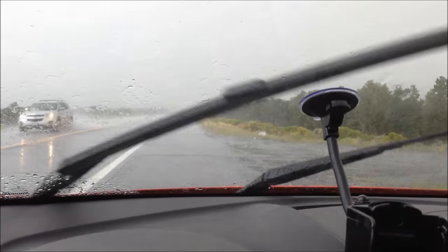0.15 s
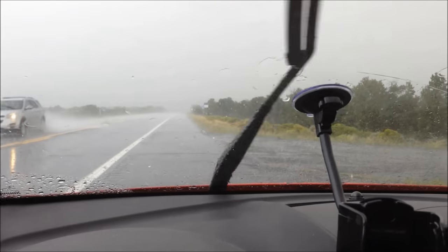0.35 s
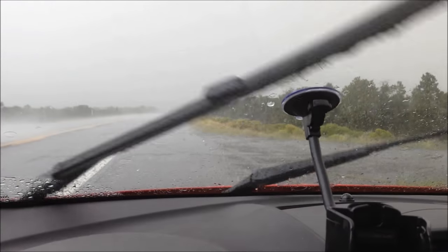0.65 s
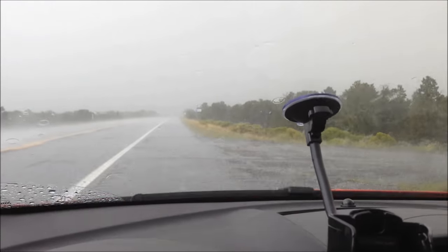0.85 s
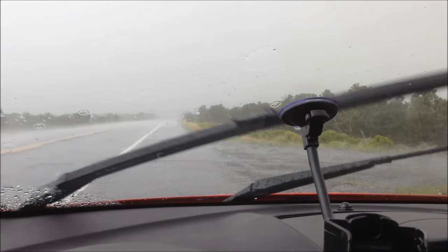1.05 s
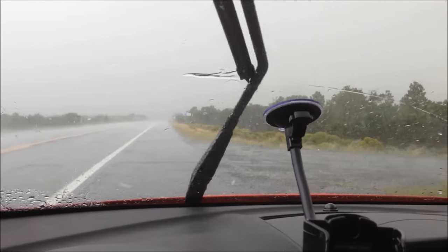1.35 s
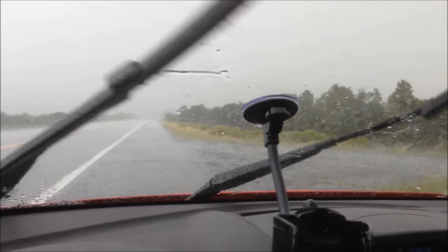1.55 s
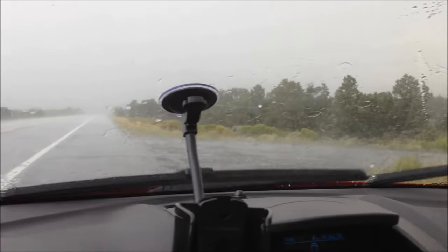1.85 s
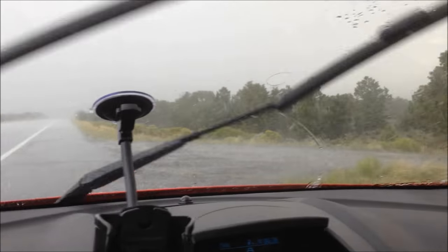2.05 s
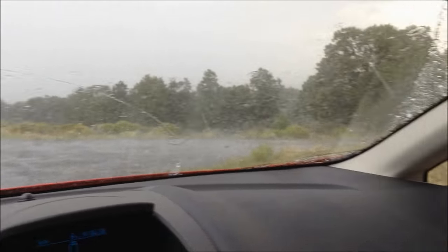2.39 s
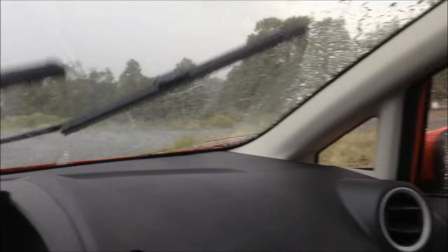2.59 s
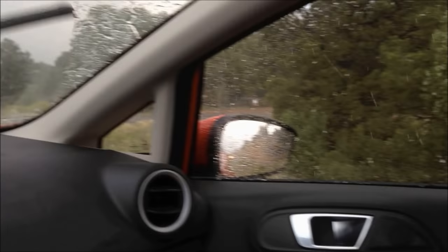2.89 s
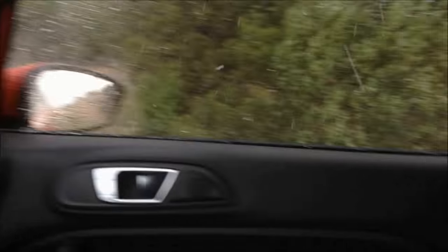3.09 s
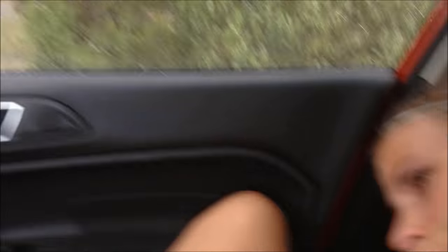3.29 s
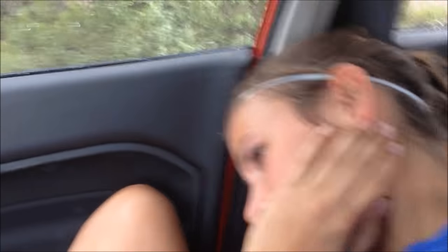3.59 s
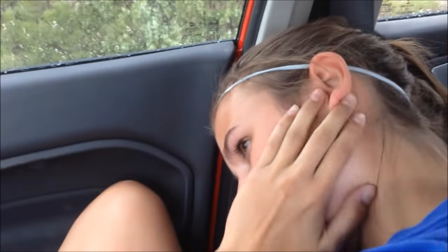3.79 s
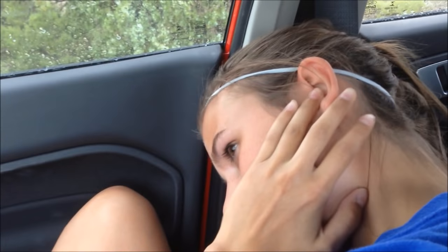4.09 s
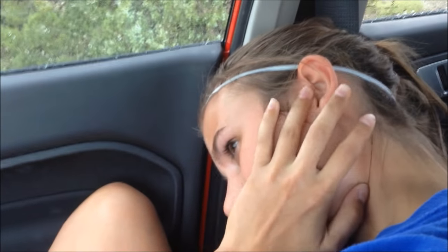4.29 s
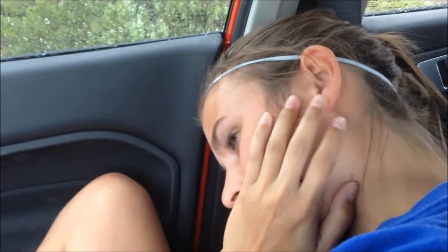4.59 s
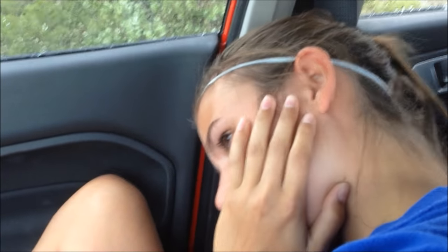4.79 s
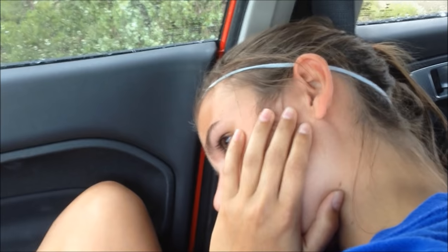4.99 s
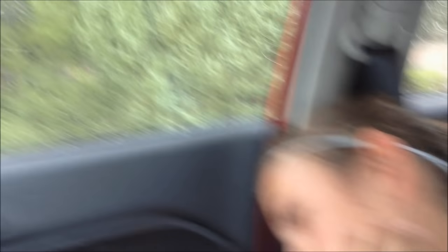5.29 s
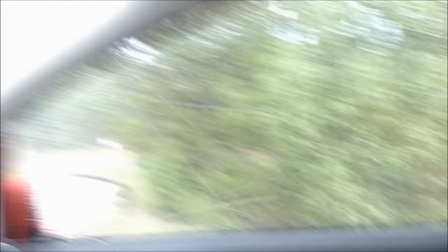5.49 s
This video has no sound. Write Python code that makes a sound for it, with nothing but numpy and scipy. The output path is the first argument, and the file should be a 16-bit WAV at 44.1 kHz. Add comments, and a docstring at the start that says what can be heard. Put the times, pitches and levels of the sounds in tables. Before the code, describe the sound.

Hailstones crack sharply on a car's windshield and thud on its roof over heavy rain, heard close from inside the cabin.

```python
"""Hail hammers a parked car in heavy rain, heard from a seat inside.
On the glass each stone is a short click plus a grainy noise tail of several decays, in third-octave bands.
Rain patter shares those bands as random drops, over a lumpy low-noise rumble of the body.
Thuds on the roof sheet are a compact knock plus a bank of decaying low modes.
A small microphone thins the bass, rounds off the loudest blows and cuts the top."""
import sys
import numpy as np
from scipy import signal
from scipy.io import wavfile
from scipy.ndimage import uniform_filter1d

SR = 44100
rng = np.random.default_rng(int(sys.argv[2]) if len(sys.argv) > 2 else 0)


def output_pcm(signal):
    """Save a mono or channel-first signal as 16-bit PCM at the path in sys.argv[1].

    Samples are clipped to [-1, 1] before scaling.
    """
    pcm = np.clip(np.atleast_2d(signal).T, -1, 1) * 32767
    wavfile.write(sys.argv[1], SR, np.round(pcm).astype(np.int16))


N = 249165

# Stones on the glass, strong and faint, each at its listed time;
# body is the low part of a crack, click its first tick, both relative to the crack:
# start_s, crack_db, body_db, spot_ring_hz, click_db
GLASS_STONES = [(0.053, -39.5, 15.5, 1740, 1), (0.074, -40.5, 9, 2240, 1), (0.1048, -32, -21, 4200, 20.5),
                (0.145, -43, -35, 4530, 16), (0.022, -50, 5, 2900, 15), (0.244, -47, -2, 4000, 15),
                (0.181, -36.5, 7, 2200, -7), (0.2589, -42, -9, 2700, 14), (0.2696, -22, 7.5, 3600, 22),
                (0.379, -29.5, -22, 4300, 22), (0.463, -50, -15, 3000, 4), (.502, -45.5, 9, 3020, 11),
                (0.522, -34.5, -11, 3620, 4), (0.5448, -30, 3, 3020, 10), (0.5507, -23.5, -5, 3400, 4),
                (0.5865, -24.5, -15, 3950, 12.5), (0.7, -39, 0, 3800, -3), (0.7063, -24, -6, 3000, 15.5),
                (0.7994, -25.5, -11, 3420, 13.5), (0.8177, -34.5, 8, 3260, -3), (0.8378, -29, -12, 3100, 3),
                (0.8538, -47, -13, 4140, 30), (0.8779, -27, -9, 3520, 13), (0.9142, -36, 1, 2110, 5),
                (0.9565, -17.5, -4, 3200, 15), (0.9668, -25, -2, 3450, 18.5),
                (1.0536, -24, 0.5, 2200, 15.5), (1.093, -38, 6, 3700, 20.5), (1.153, -34.5, 4.5, 5270, -1),
                (1.207, -25.5, 2, 2670, 16), (1.226, -33, 4, 2800, 18), (1.29, -51, -2, 3000, -3),
                (1.313, -38, -2, 4670, 4), (1.347, -30, -8, 2200, 3.5), (1.3865, -31.5, -10, 3580, 9),
                (1.422, -36.5, 5, 4200, 12), (1.433, -32.5, 1, 3160, 2), (1.541, -41, 11, 2340, 0),
                (1.638, -21.5, -11, 4180, 11), (1.688, -25, -4, 3300, 19.5), (1.7443, -24.5, -8, 3900, 16),
                (1.805, -45.5, 11, 2960, -5), (1.824, -28.5, -28, 3120, 20), (1.8603, -21.5, -12, 3940, 4),
                (1.874, -28, 0, 3460, 18), (1.929, -50.5, 17, 1980, 10), (1.9577, -45.5, -2, 3000, -6),
                (1.985, -25, -2, 4850, 18.5), (2.016, -26.5, 5, 2920, 3.5),
                (2.0775, -24.5, 3.5, 2920, 12.5), (2.1448, -29, -34, 3200, 23.5),
                (2.1843, -55, -20, 4000, 12), (2.215, -49.5, -36, 3000, 6), (2.2537, -30, -16, 3050, 2),
                (2.269, -26, -7, 2620, 6), (2.354, -38.5, 14.5, 2610, 0.5), (2.413, -27.5, -14, 3000, 13),
                (2.4428, -39.5, -10, 2910, 18), (2.497, -39, -18, 5120, 6), (2.542, -20, 1, 3260, 10.5),
                (2.5966, -21.5, -5, 4440, 8), (2.6124, -20.5, -12, 2520, 8), (2.6284, -29.5, -7, 4220, -9),
                (2.682, -56, -30, 6000, 18), (2.6953, -52, 13, 2500, -5), (2.748, -47, -10, 4800, 14),
                (2.759, -45, -23, 4480, 11), (2.767, -41, 1, 3600, -6), (2.811, -41, 12.5, 3000, -9),
                (2.853, -41.5, 11, 2010, -5), (2.8803, -48, -5, 3480, 15), (2.9142, -21, -11, 3130, 7),
                (2.963, -35, -1, 2380, 9), (3.0106, -51, -8, 2800, -1), (3.031, -26.5, 6, 2520, -0.5),
                (3.046, -25.5, -2.5, 2010, 12.5), (3.125, -32, 12.5, 1730, -9), (3.223, -33, 4.5, 4000, -1),
                (3.2445, -30.5, 14, 3040, 3), (3.29, -19, -9, 2110, 4.5), (3.365, -24, -1, 3680, 11),
                (3.422, -38.5, 13, 3150, -7), (3.334, -42, 10, 2930, 4), (3.436, -30, -24, 1780, 3),
                (3.4709, -24, -20, 4200, 13), (3.5471, -34, 10.5, 2020, 10.5), (3.5782, -35, 9.5, 1700, -8),
                (3.666, -24.5, 7.5, 2140, 3), (3.74, -38.5, -31, 5300, 4), (3.762, -30.5, 9, 4000, -3),
                (3.774, -22, 5.5, 3000, 3), (3.7864, -25.5, -25, 3170, 16), (3.8253, -27, -3, 3800, 7),
                (3.8635, -31, 7, 1940, 3), (3.9405, -26, -2, 2770, -10), (3.9775, -41, 11, 3000, -4),
                (3.996, -23.5, 1, 2900, 12), (4.0391, -22.5, 0, 3600, 11), (4.0948, -27, 7.5, 2500, 2),
                (4.1036, -22.5, 2, 2560, 14), (4.111, -25.5, -11, 4500, 4), (4.195, -26, -2, 4470, 6),
                (4.2418, -41.5, 3, 5000, -6), (4.2703, -38, 11, 1300, 20.5), (4.283, -32, 11.5, 2650, -8),
                (4.298, -30, 21, 1800, 3), (4.376, -30.5, -2, 2650, 2), (4.4063, -18, -3, 3260, 8),
                (4.432, -27.5, -2, 3300, 1.5), (4.4522, -30, -1.5, 4900, 19), (4.5505, -48, 22, 2030, 14),
                (4.5813, -41.5, 17, 2120, 5), (4.612, -29, -10, 3000, 3), (4.6169, -23.5, -8, 3460, 10),
                (4.6565, -24.5, -2, 4100, 10), (4.669, -31.5, 11.5, 1700, -5), (4.702, -41.5, 8, 1700, -5),
                (4.7504, -35.5, 17.5, 2120, 8), (4.797, -25, -18, 4200, 15), (4.8302, -51, -10, 2800, 17),
                (4.854, -43, -13, 2600, 8), (4.8658, -38, 3, 2960, 14), (4.883, -42, -8, 2780, 8),
                (4.911, -40, 9.5, 2500, -6), (4.9337, -35, 13.5, 1760, 1.5), (4.972, -41, 1, 3000, 6),
                (4.995, -34, 3, 1950, -9), (5.025, -24.5, 1, 4230, -16), (5.0514, -19, -4, 4030, 8),
                (5.079, -18.5, -3, 2700, 10), (5.118, -19, -6.5, 3520, 2), (5.142, -29, 2, 4130, -4),
                (5.2084, -57, -8, 3500, 6), (5.2509, -16.5, -15.5, 4700, 5), (5.2967, -22, -10, 1700, 3.5),
                (5.3763, -27, -4, 1790, 2), (5.3923, -34, -12, 3620, 7), (5.478, -33, 6, 4000, 6),
                (5.4921, -20.5, -15, 3080, 1.5), (5.506, -25, 10, 3180, 5), (5.5218, -28.5, 10, 1650, 1.5),
                (5.557, -40, -26, 3250, 7), (5.585, -30.5, 8, 2110, 1.5), (5.619, -33, 14, 3000, 8),
                (5.632, -19.5, 3, 2870, 8)]
# Stones on the roof; boom (lowest modes) and knock (highest modes) are relative to the thud:
# start_s, thud_db, boom_db, knock_db, spot_ring_hz
ROOF_STONES = [(.0575, -44.5, 11, 1, 239), (.075, -33, 5, -6, 264), (.155, -49, 12.5, -15, 240),
               (.268, -33.5, -3, -7, 354), (.332, -50.5, 17, -15, 246), (.378, -40, -24, 4.5, 586),
               (.5468, -43, -4, 11, 242), (.592, -36.5, 2, -28, 231), (.7054, -33.5, -16, -24, 442),
               (.8199, -32, -29, -7, 286), (.886, -37, 1.5, -10, 245), (.9537, -35.5, -20, -35, 428),
               (1.038, -46, -5, 7, 500), (1.052, -33.5, 4, -24, 405), (1.095, -38.5, 8, -11, 299),
               (1.1773, -36, -5, -6, 430), (1.2209, -34, 0, -4, 477), (1.4047, -31.5, -18, -5.5, 380),
               (1.433, -33.5, -36, -20, 314), (1.542, -37.5, 2.5, 1.5, 965), (1.57, -37, 4, -17, 246),
               (1.685, -35, -28, -38, 236), (1.8214, -33, -2, -13, 400), (2.0152, -20, -38, -0.5, 502),
               (2.1411, -35, -25, -3, 400), (2.3551, -37, 0, -19, 403), (2.3808, -40, -15, -2, 276),
               (2.403, -26.5, -4.5, -5, 313), (2.5571, -27, -1.5, -5, 226), (2.8309, -32.5, -9.5, -13, 291),
               (2.857, -29, -7, -19, 288), (3.0407, -22.5, -39, 0.5, 373), (3.1218, -23.5, -43, -3, 331),
               (3.2124, -31.5, -4, -6, 216), (3.2434, -20.5, -48, -6, 363), (3.3618, -27.5, -8, -31, 257),
               (3.4552, -33.5, -7, 2.5, 595), (3.5788, -22.5, -6, -11, 350), (3.7675, -16, -11, -24, 272),
               (3.8462, -35, 7, -9, 375), (3.8618, -27, -9, -2.5, 447), (3.9385, -33, -2, 2.5, 230),
               (3.9831, -23, -10, -27, 228), (4.0959, -31, -16, 2, 295), (4.139, -31, -15, -5, 390),
               (4.2016, -34, 3.5, -22, 350), (4.277, -20.5, -29, -23, 336), (4.297, -11.5, -49, -13.5, 405),
               (4.372, -38, -25, -2, 580), (4.405, -42.5, 12.5, -5, 241), (4.4312, -47, -10, -13, 460),
               (4.5523, -33, -2, -6, 314), (4.6111, -39, -2, 8.5, 290), (4.669, -22.5, -8, -4, 265),
               (4.7583, -30.5, 1, -7, 313), (4.8532, -39, -6, -13, 293), (4.9109, -32, -25, -2, 350),
               (4.9299, -16.5, -56, -22, 416), (4.999, -25.5, -33, -14, 341), (5.0359, -23, -27, -7, 570),
               (5.0826, -36, 6, -6, 290), (5.144, -18.5, -34, -4, 359), (5.16, -28, -19, -1, 466),
               (5.2527, -26.5, -20, -5, 330), (5.3228, -27, 0.5, -7, 342), (5.387, -33, -27, -3, 330),
               (5.5018, -23.5, 2, -5.5, 426), (5.5216, -18, -37, -9.5, 425), (5.535, -23.5, -2.5, -11, 375),
               (5.5828, -21, -39, -33, 330), (5.6195, -22, -29, -4, 380), (5.6403, -11, -43, -23, 341.5)]
# Ebb and flow of the rain: time_s, patter_db, rumble_db
RAIN_LEVELS = [(0.0, -35, -35), (0.2, -39.5, -30), (0.45, -48.5, -45.5), (0.65, -45, -34), (0.99, -40, -43),
               (1.45, -45.5, -38), (1.9, -49, -39.5), (2.41, -38.5, -33.5), (3.13, -42.5, -38),
               (3.27, -43.5, -36), (3.7, -34.5, -32.5), (4.0, -35.5, -30.5), (4.47, -45.5, -38.5),
               (5.19, -38, -25.5), (5.33, -37, -38), (5.65, -32, -25)]
# Modes of the roof sheet and cabin: pitch_hz, level_db, t60_s
SHEET_MODES = [(127.6, -1, 0.25), (145.2, 11, 0.17), (168, 5.5, 0.15), (201, 7, 0.13), (176, 5.5, 0.15),
               (229.2, 2, 0.11), (255.6, -10.5, 0.097), (281, -4, 0.16), (314.4, -1.5, 0.085),
               (343, -3, 0.15), (369.8, -7.5, 0.1154), (391.6, -6, 0.14), (424.7, -4, 0.15),
               (469.3, -3, 0.123), (516, -2.5, 0.092), (539, -9.5, 0.041), (593, 0, 0.086), (621, 0, 0.042),
               (694, 3, 0.08), (781, 2, 0.064), (866, 2, 0.077), (936, -4.5, 0.052), (980, 1.5, 0.075),
               (1107, 0, 0.044), (353, -4, 0.063)]
# Colour of a crack: pitch_hz, density_db (per Hz)
CRACK_COLOUR = [(600, -1.5), (1300, -2), (1900, 0.5), (2600, 0), (4000, -1), (5600, 0.5), (7500, 4.5),
                (10500, -3.5), (15000, -10)]
# How fast the main tail of a crack dies in the padded cabin: pitch_hz, t60_s
CRACK_DECAY = [(700, 0.072), (1800, 0.082), (4800, 0.072), (9000, 0.059), (14000, 0.078)]
# Colour of the rain patter: pitch_hz, density_db (per Hz)
PATTER_COLOUR = [(240, -30), (400, 2), (800, -17.5), (1300, -9), (2710, -7.5), (3970, -12), (5230, -15.5),
                 (14100, -29), (15500, -25)]
# Colour of the body rumble: pitch_hz, density_db (per Hz)
RUMBLE_COLOUR = [(25, -16), (45, 27.5), (75, 8.5), (120, 5), (185, 10.5), (300, 2), (430, -3), (900, -9.5)]

MIC_LOW_CUT_HZ, MIC_TOP_CUT_HZ = 186.6, 16450
CEILING = 0.48   # sample height the overload approaches
DIRECT_DB = 4   # gain of the straight path from glass to microphone
PANE_DB, DROP_DB = 6, 6.5   # how strongly stones and raindrops feed each band of the cabin
MODE_SHARE_DB = -7.5   # share of a blow that one mode takes
# the more body a crack has, the less treble: dB over the crack, and dB lost per dB of body
TREBLE_DB, TREBLE_LOSS_PER_BODY = -11.5, 0.29
RANDOM_STONE_DB, RANDOM_SPREAD_DB = -1, 2.5   # random stones: level over the patter, and its spread
KNOCK_DB = 12   # compact knock of the denting sheet, over the thud
TICK_DB = 10   # sharp first tick of a raindrop, over its patter
SPOT_DB = 2.0   # spread of crack colour from spot to spot
CLUMP_DB = 2.6   # unevenness of the grain in the tails
SWELL_LEAD_S = 0.004   # a swelling crack starts this long before its listed time


def from_db(db):
    """Turn dB into gain."""
    return 10 ** (np.asarray(db) / 20)


def rms_one(x):
    """Scale to rms 1."""
    return x / np.sqrt(np.mean(x ** 2) + 1e-20)


def at_hz(points, hz):
    """Read (Hz, value) points on a log-frequency axis."""
    points = np.array(points)
    return np.interp(np.log(hz), np.log(points[:, 0]), points[:, 1])


def train(seconds, sizes):
    """Place clicks of the given sizes at the given times, over a negligible floor."""
    out = np.full(N, 1e-18)
    np.add.at(out, np.clip((seconds * SR).astype(int), 0, N - 1), sizes)
    return out


def dying(power, t60):
    """Power left behind by each click, falling 60 dB in t60 seconds."""
    return signal.lfilter([1], [1, -from_db(-120 / (t60 * SR))], power)


def bands(low_hz, count):
    """Third-octave band-passes: (centre Hz, filter)."""
    edges = low_hz * 2 ** (np.arange(count + 1) / 3)
    return [(np.sqrt(a * b), signal.butter(2, [a, b], "band", fs=SR, output="sos"))
            for a, b in zip(edges, edges[1:])]


def clicks(s, hz, size, cycles, rise):
    """Direct sound of each stone: a few cycles of ring (rise 0 at once, 1 swelling), one echo off the dashboard."""
    out, t = np.zeros(N + 800), np.arange(800) / SR
    for start, pitch, height in zip((s * SR).astype(int), hz, size):
        age = t * pitch / cycles
        out[start:start + len(t)] += height * np.sin(2 * np.pi * pitch * t) * age ** rise * np.exp(-age)
    lag = int(0.001477 * SR)
    out[lag:] += 0.2 * out[:-lag].copy()
    return out[:N]


def random_stones(patter_db, count):
    """More glass stones at random times, their strength following the patter level at that moment."""
    when, chance = rng.uniform(0, N - 1, count), rng.standard_normal((count, 4))
    crack_db = patter_db[when.astype(int)] + RANDOM_STONE_DB + RANDOM_SPREAD_DB * chance[:, 0]
    body_db = -3 + 7 * chance[:, 1]
    ring_hz = 2800 * 2 ** (0.19 * chance[:, 2])
    click_db = 9 + 3 * chance[:, 3]
    return np.column_stack([when / SR, crack_db, body_db, ring_hz, click_db])


def glass(patter_db):
    """A stone gives a click and a grainy tail of reflections, coloured by the spot; raindrops share the grain."""
    stones = np.vstack([GLASS_STONES, random_stones(patter_db, count=14)])
    s, crack_db, body_db, ring_hz, click_db = stones.T
    treble_db = TREBLE_DB - TREBLE_LOSS_PER_BODY * body_db
    white, spot = rng.standard_normal((2, N)), rng.standard_normal((len(s), 16))
    # reflections and ice splinters arrive in clumps under a millisecond long
    clumps = rms_one(uniform_filter1d(rng.standard_normal(N), size=25))
    white = rms_one(white * from_db(CLUMP_DB * clumps))
    sign = np.sign(spot[:, -1])
    click_size = sign * from_db(crack_db + click_db + DIRECT_DB)
    out = clicks(s + 0.0004, ring_hz, click_size, cycles=0.6, rise=0)
    # the weaker the first click, the more the stone counts as out of sight
    hidden = np.clip((4 - click_db) / 6, 0, 1)
    drop_s = rng.uniform(0, N / SR, 1600)
    drop_db = 4.5 * np.minimum(rng.exponential(1, 1600), 3.5)
    drop_colour = rng.standard_normal((1600, 15))
    for k, (hz, band) in enumerate(bands(503.0, count=15)):
        body_tilt_db = at_hz([(1150, 1), (2300, 0)], hz) * body_db
        treble_tilt_db = at_hz([(5000, 0), (7000, 1)], hz) * treble_db
        colour_db = at_hz(CRACK_COLOUR, hz) + SPOT_DB * spot[:, k]
        size = from_db(crack_db + body_tilt_db + treble_tilt_db + colour_db + PANE_DB)
        spot_boost = from_db(6.0) * np.exp(-(np.log2(hz / ring_hz) / 0.37) ** 2)
        t60 = at_hz(CRACK_DECAY, hz)
        power = dying(train(s, (1 - hidden) * size ** 2), t60)
        # out of sight, the tail arrives by reflections and swells over some ms
        swell = dying(train(s - SWELL_LEAD_S, hidden * size ** 2), 0.1)
        power += dying(swell, t60) * 280 / SR
        # bands near the pitch of the struck spot stand out briefly over the broad tail
        power += dying(train(s, (1 - hidden / 2) * (size * spot_boost) ** 2), 0.045)
        # the stone splinters brightly as it lands
        splinter = size * from_db(click_db - 14 + 3 * np.log2(hz / 3000))
        power += dying(train(s, splinter ** 2), 0.007)
        # a weak noise tail under the crack
        power += dying(train(s, (size * from_db(-29)) ** 2), 0.077)
        # each drop is a sharp tick and a short tail, over a steady wash
        drop = train(drop_s, from_db(drop_db + 4.0 * drop_colour[:, k]) ** 2)
        drops = dying(drop, 0.6 * t60) + dying(drop * from_db(TICK_DB), 0.006)
        rain_gain = from_db(patter_db + at_hz(PATTER_COLOUR, hz) + DROP_DB)
        rain = rain_gain * rms_one(np.sqrt(drops + 0.9))
        snap = train(s + 0.0003, sign * size * from_db(click_db - 6 + 2.9 * np.log2(hz / 3000)))
        out += signal.sosfilt(band, white[k % 2] * np.sqrt(power + rain ** 2) + snap)
    return out


def rumble(level_db):
    """Rain over the whole body keeps the low panels moving: a lumpy low noise."""
    white, out = rng.standard_normal((2, N)), 0
    # about 60 random pushes a second over a steady floor
    pushes = (rng.random(N) < 60 / SR) * np.minimum(rng.exponential(1, N), 1.8) ** 2
    lumps = np.sqrt(dying(pushes, 0.1) + 0.14)
    for k, (hz, band) in enumerate(bands(25.3, count=16)):
        out = out + from_db(at_hz(RUMBLE_COLOUR, hz)) * signal.sosfilt(band, white[k % 2] * lumps)
    return from_db(level_db) * rms_one(out)


def ring(clicks, hz, t60):
    """A two-pole resonator: a unit click sets a sine of height about 1 ringing."""
    r, w = from_db(-60 / (t60 * SR)), 2 * np.pi * hz / SR
    return signal.lfilter([0, np.sin(w)], [1, -2 * r * np.cos(w), r * r], clicks)


def roof():
    """Stones strike every mode of the sheet with varied strength; glass stones shake the same modes weakly."""
    # through the frame: start, weaker thud, boom, knock, ring
    on_glass = [(s, crack_db - 10.5, -4.0, -8.0, 300) for s, crack_db, *rest in GLASS_STONES]
    s, thud_db, boom_db, knock_db, ring_hz = np.transpose(list(ROOF_STONES) + on_glass)
    struck = len(ROOF_STONES)
    knock_size = from_db(thud_db[:struck] + KNOCK_DB)
    out = clicks(s[:struck], ring_hz[:struck], knock_size, cycles=0.75, rise=1)
    spot = rng.standard_normal((len(s), len(SHEET_MODES), 2))
    for k, (hz, level_db, t60) in enumerate(SHEET_MODES):
        boom_tilt_db = at_hz([(215, 1), (250, 0)], hz) * boom_db
        knock_tilt_db = at_hz([(570, 0), (630, 1)], hz) * knock_db
        ring_db = 10.4 * np.exp(-(np.log2(hz / ring_hz) / 0.08) ** 2)
        blow_db = thud_db + boom_tilt_db + knock_tilt_db + ring_db
        size = from_db(blow_db + level_db + MODE_SHARE_DB + 2.77 * spot[:, k, 0])
        late = 0.0012 + 0.01212 * t60 * np.abs(spot[:, k, 1])
        # most modes start with the same sign, as one push, and then drift apart
        push = np.sign(spot[:, k, 1] + 0.7)
        out += ring(train(s + late, size * push), hz, t60)
    return out


def scene():
    """Glass, rumble and roof summed at one microphone."""
    s, *levels = np.transpose(RAIN_LEVELS)
    patter_db, rumble_db = (np.interp(np.arange(N) / SR, s, level) for level in levels)
    return (glass(patter_db) + rumble(rumble_db) + roof())[None]


def record(dry):
    """A small microphone thins the bass, the input overloads at a firm ceiling, the top is cut."""
    low_cut = signal.butter(3, MIC_LOW_CUT_HZ, "high", fs=SR, output="sos")
    thin = signal.sosfilt(low_cut, dry)
    # the capsule gives a little more one way, so loud blows leave a faint sub-bass bump
    thin = thin + 0.066 * thin ** 2
    held = thin / (1 + (thin / CEILING) ** 6) ** (1 / 6)
    top_cut = signal.cheby2(10, 60, MIC_TOP_CUT_HZ, fs=SR, output="sos")
    return signal.sosfilt(top_cut, held)


dry = scene()
out = record(dry)
output_pcm(out)
```